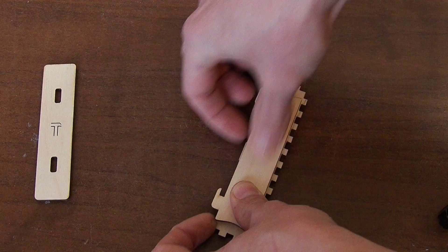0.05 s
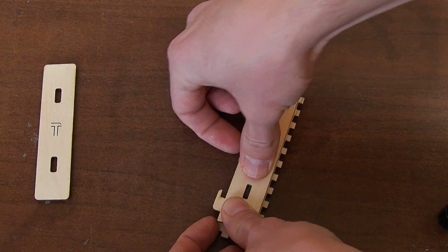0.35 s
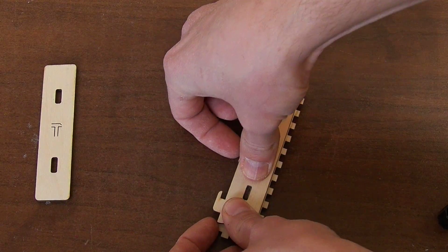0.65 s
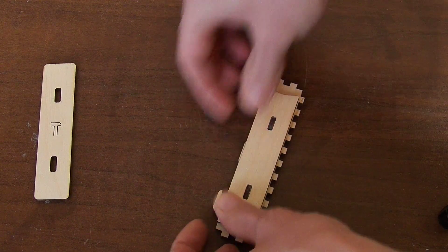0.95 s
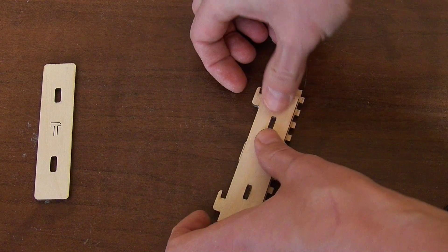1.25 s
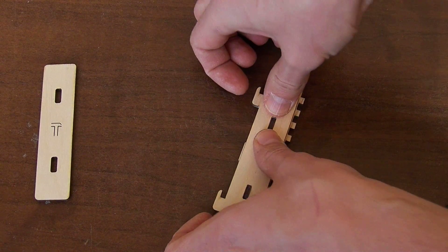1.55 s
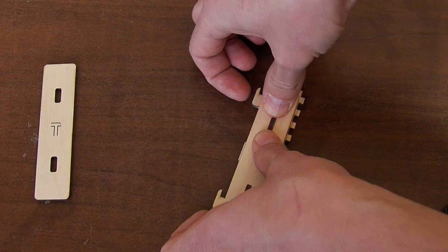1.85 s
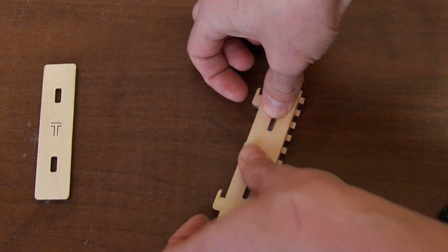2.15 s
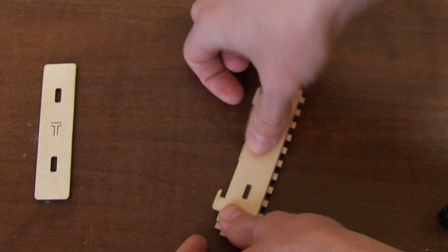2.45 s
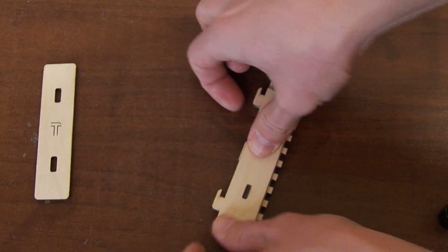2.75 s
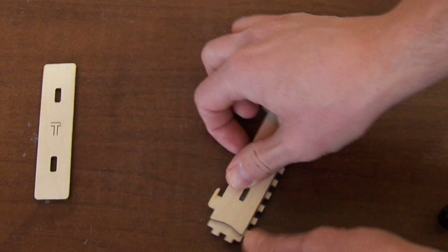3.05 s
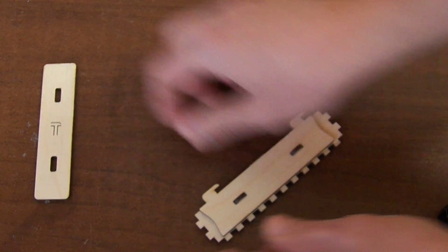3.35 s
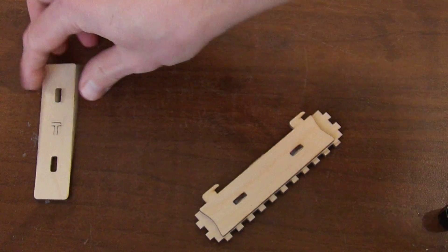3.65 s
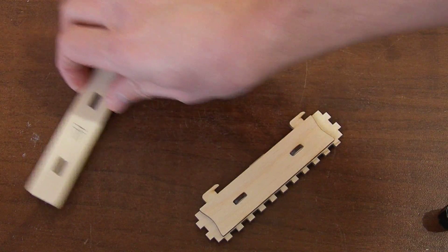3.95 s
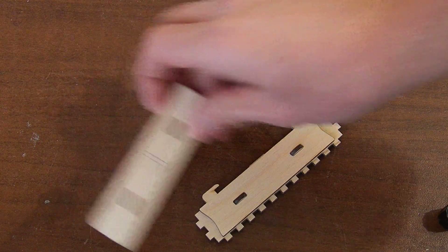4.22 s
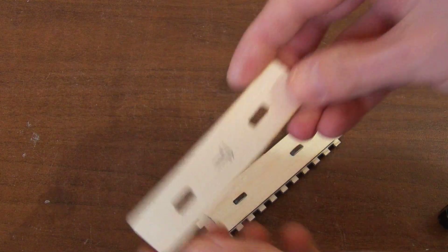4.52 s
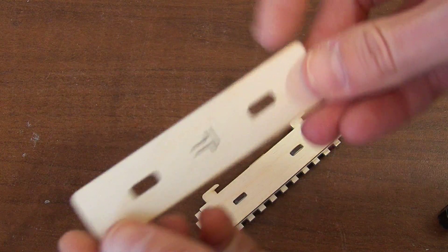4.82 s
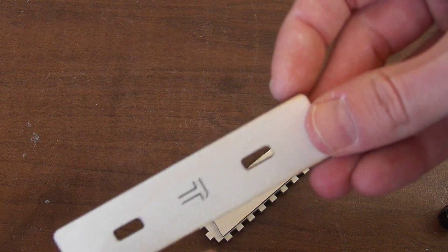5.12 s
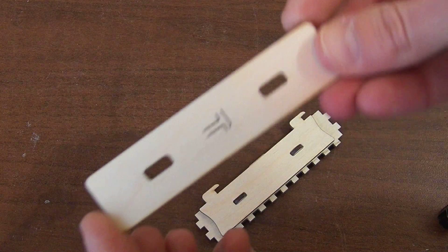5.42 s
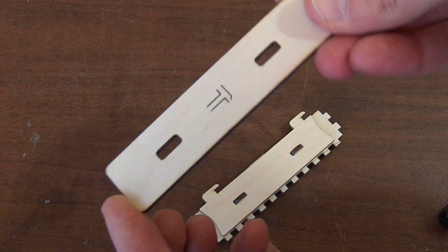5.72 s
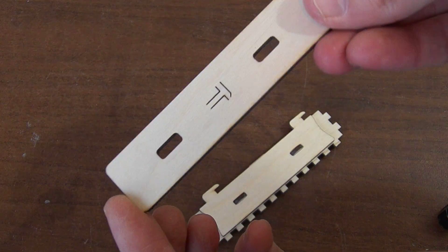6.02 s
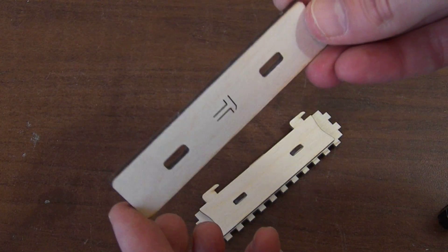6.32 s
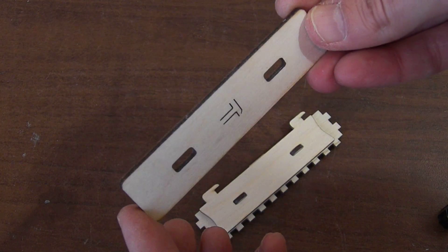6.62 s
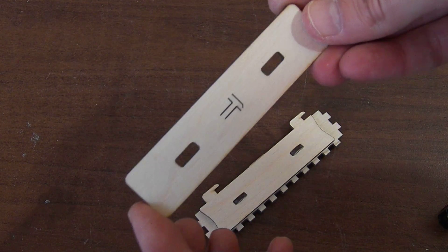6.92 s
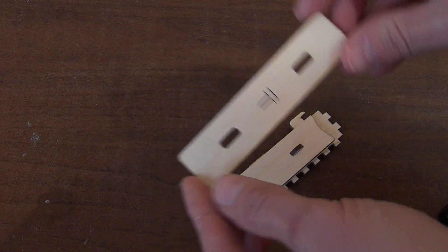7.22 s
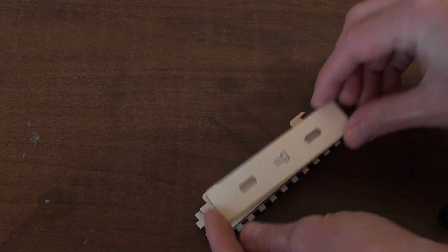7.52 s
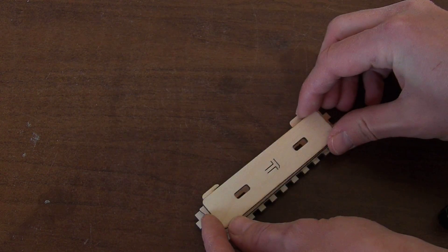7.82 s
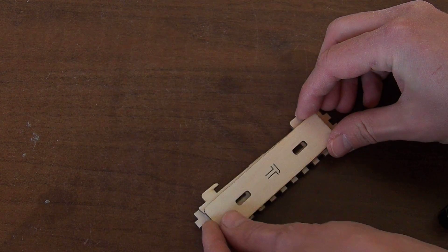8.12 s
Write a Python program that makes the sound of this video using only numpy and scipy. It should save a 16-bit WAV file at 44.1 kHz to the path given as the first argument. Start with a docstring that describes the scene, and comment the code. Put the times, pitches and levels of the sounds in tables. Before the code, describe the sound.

Small wooden parts rub and click into place with two sharp, splintery snaps, heard close up with a short room ring. After that everything is much quieter: hands rustle, wood scrapes briefly over a table, and a few light taps come as a thin strip is picked up and set down. Faint purring steps of a camera's focus motor and a low hiss run underneath.

```python
"""In a small room, over the hiss of a camera close by, thumbs press a thin plywood strip onto two tabs.
Each snaps home in turn, an impulse that excites the modes of strip, tab and wooden table; the camera's
gain control ducks after each snap and creeps back. From the first second on, its lens motor steps softly.
The piece is slid aside with a grind of friction. A second strip is picked up, turned in the fingers
and at last laid on top with a light tap."""
import sys
import numpy as np
from scipy import signal
from scipy.fft import rfft, irfft
from scipy.io import wavfile
from scipy.ndimage import uniform_filter1d, minimum_filter1d

SR = 44100
rng = np.random.default_rng(int(sys.argv[2]) if len(sys.argv) > 2 else 0)


def transcribe(signal):
    """Save signal, clipped to [-1, 1], as a 16-bit WAV file at the path in sys.argv[1]."""
    frames = np.atleast_2d(signal).T
    limited = np.clip(frames, -1, 1)
    pcm = np.round(limited * 32767).astype(np.int16)
    wavfile.write(sys.argv[1], SR, pcm)


N = 360297
TIME = np.arange(N) / SR

# modes of the plywood strip: pitch_hz, level_db, t60_s
STRIP_MODES = [(1180, -23, .015), (1814, -38, .025), (1970, -23, 0.035), (2780, -33, .025),
               (3573, -26, .03), (3840, -18.5, .02), (4100, -26, 0.022), (5170, -19, .025),
               (5800, -22.5, .015), (6700, -21, .02), (7145, -30, .02), (7220, -28.5, .02),
               (7660, -24, .02), (10130, -21, .012), (10800, -12, .015), (13300, -11.5, 0.0067)]
# modes of the table top: pitch_hz, level_db, t60_s
TABLE_MODES = [(88, -29, 0.33), (122, -15, 0.06), (183, -19.5, 0.039), (260, 1, 0.011), (360, -8.5, 0.024),
               (438.3, -3, 0.026), (550, -21.5, 0.087), (806, -16.5, .04)]


def undb(db):
    """Decibels as an amplitude ratio."""
    return 10 ** (np.asarray(db) / 20)


def unit(x):
    """Normalisation to an rms of 1."""
    return x / np.sqrt(np.mean(x ** 2))


def add(track, start_s, sound):
    """Superposition: a sound adds to the track from start_s on."""
    start = max(int(start_s * SR), 0)
    part = sound[..., :N - start]
    track[..., start:start + part.shape[-1]] += part


def colour(x, spectrum):
    """Spectral shaping by (frequency_hz, level_db) points, to an rms of 1."""
    hz, db = np.transpose(spectrum)
    bins = np.maximum(np.fft.rfftfreq(x.shape[-1], 1 / SR), 1)
    gain = undb(np.interp(np.log(bins), np.log(hz), db))
    return unit(irfft(rfft(x) * gain, x.shape[-1]))


def lowpass(x, hz, order=2):
    """Attenuation above a cut-off."""
    return signal.sosfilt(signal.butter(order, min(hz, .45 * SR), fs=SR, output="sos"), x)


def highpass(x, hz, order=2):
    """Attenuation below a cut-off."""
    return signal.sosfilt(signal.butter(order, hz, "high", fs=SR, output="sos"), x)


def pair(size, coherence):
    """Partial coherence: left and right noise share a fraction of their power."""
    noise = rng.standard_normal((3, size))
    return np.sqrt(coherence) * noise[2] + np.sqrt(1 - coherence) * noise[:2]


def held(size, samples):
    """Sample and hold: random values, each kept for so many samples."""
    return np.repeat(rng.standard_normal(size // samples + 1), samples)[:size]


def fade(t, t60):
    """Exponential decay, 60 dB in t60 seconds."""
    return np.exp(-np.log(1000) * t / t60)


def swell(start_s, length_s, edge_s):
    """Trapezoidal envelope, half way up at the start and at the end of its length."""
    return np.clip(.5 + np.minimum(TIME - start_s, start_s + length_s - TIME) / edge_s, 0, 1)


def ring(t, modes, detune, scatter_db):
    """Damped modes: each blow meets them in another place, and each radiates its own share to each side."""
    hz, db, t60 = np.transpose(modes)
    hz = hz * (1 + detune * rng.standard_normal(len(hz)))
    shares = undb(db + scatter_db * rng.standard_normal((2, len(hz))))
    return shares @ (np.sin(2 * np.pi * hz[:, None] * t) * fade(t, t60[:, None]))


def background(air_db=-58.5, hiss_db=-57, whine_hz=678, whine_db=-74, drone_hz=160, drone_db=-64):
    """Noise floor: low room noise, a thin whine and a passing drone under the microphone's self-noise."""
    # spectrum of the room's air: frequency_hz, density_db
    air_spectrum = [(20, -8.5), (35, 6.5), (48, 9), (60, -2.5), (90, 2), (170, -0.5), (240, -9.5),
                    (310, -6.5), (390, 5), (480, -2), (800, -5), (1400, -14.5), (2600, -36), (5000, -40)]
    # spectrum of the microphone's hiss: frequency_hz, density_db
    hiss_spectrum = [(300, 5), (1500, 0.5), (3000, -8.5), (4300, -35.5), (6000, -4.5), (8000, 0.5),
                     (11000, 2.5), (15500, 2)]
    air = undb(air_db) * colour(pair(N, coherence=.65), air_spectrum)
    hiss = undb(hiss_db) * colour(pair(N, coherence=0), hiss_spectrum)
    whine = undb(whine_db) * np.sin(2 * np.pi * whine_hz * TIME)
    passing = swell(start_s=6.24, length_s=.3, edge_s=.065)
    drone = undb(drone_db) * passing * np.sin(2 * np.pi * drone_hz * TIME)
    return air + hiss + np.sqrt(2) * (whine + drone)


def fingers(hold_db=-73, edge_s=.1):
    """Friction noise: dry skin whispers on sanded wood and hands rustle; incoherent parts add in power."""
    # changes of grip: start_s, length_s, whisper_db, rustle_db
    grips = [(0, 0.36, -65.5, -60.5), (1.15, 0.49, -98, -52), (2.0, 0.56, -75.5, -51),
             (2.335, 0.39, -59, -52), (2.808, 0.72, -65.5, -72), (3.62, 0.47, -64.5, -57),
             (4.21, 0.71, -67, -78), (5.08, 0.59, -69.5, -65.5), (7.078, 0.48, -69, -75),
             (7.45, 0.77, -69.5, -80)]
    # spectrum of skin on wood: frequency_hz, density_db
    skin_spectrum = [(1000, -10.5), (1900, -2.5), (3000, -3), (4500, -1), (5600, -1), (8000, -5),
                     (15000, -17.5)]
    # spectrum of a moving hand: frequency_hz, density_db
    rustle_spectrum = [(60, 2.5), (110, 3), (240, -3.5), (420, 4), (800, -5.5), (1400, -13), (2600, -34.5),
                       (6000, -48.5)]
    whisper_power, rustle_power = undb(hold_db) ** 2, 0  # fingers that only hold still whisper
    for start_s, length_s, whisper_db, rustle_db in grips:
        motion = swell(start_s, length_s, edge_s)
        whisper_power += motion * undb(whisper_db) ** 2
        rustle_power += motion * undb(rustle_db) ** 2
    whisper = np.sqrt(whisper_power) * colour(pair(N, coherence=.13), skin_spectrum)
    rustle = np.sqrt(rustle_power) * colour(pair(N, coherence=.83), rustle_spectrum)
    return whisper + rustle


def slides(grain_db=2, lurch_db=3, edge_s=.007, catch_per_s=300, catch_db=-9, catch_spread_db=5):
    """Sliding friction: fibres grind in dense grains, single catches ring the strip, sharp edges squeak."""
    # wood sliding on wood or on the table: start_s, length_s, grind_db, squeak_db
    strokes = [(0.021, .03, -60, -44.5), (.21, .015, -54, -57.5), (0.336, .03, -63.5, -69),
               (0.851, 0.067, -39.5, -55), (1.543, 0.11, -61, -92), (2.213, 0.028, -49, -54),
               (2.778, 0.013, -54.5, -56), (2.846, .245, -55, -64), (3.205, 0.1, -59, -69),
               (3.28, 0.032, -54, -71), (3.715, 0.035, -58, -52), (3.732, .018, -43, -58),
               (3.748, 0.23, -60, -70), (3.844, 0.076, -61, -61), (4.823, 0.022, -68, -62)]
    # spectrum of grinding fibres: frequency_hz, density_db
    grind_spectrum = [(60, -14), (250, -3.5), (450, 6.5), (800, -1), (1250, -6), (1800, -5.5),
                      (2400, -12.5), (3000, -7.5), (4000, -11.5), (4900, -20.5), (8000, -28),
                      (15000, -34.5)]
    # spectrum of a squeaking edge: frequency_hz, density_db
    squeak_spectrum = [(2000, -20.5), (3600, -14.5), (4800, -12), (5700, -8), (6500, -7), (7600, -4),
                       (9000, -11), (11000, -22), (15000, -25.5)]
    out, t = np.zeros((2, N)), TIME[:SR // 3]
    for start_s, length_s, grind_db, squeak_db in strokes:
        # the piece moves in small lurches, with a new grip about every millisecond
        lurch = uniform_filter1d(held(len(t), samples=441), size=220)
        grip = undb(grain_db * held(len(t), samples=49))
        stroke = np.clip(np.minimum(t, length_s + edge_s - t) / edge_s, 0, 1) * undb(lurch_db * lurch)
        caught = rng.random(len(t)) < catch_per_s / SR
        catches = caught * undb(catch_spread_db * rng.standard_normal(len(t)))
        # the fingers clamp the strip differently in every stroke, which shifts its modes
        strip = ring(t, STRIP_MODES, detune=.035, scatter_db=3)
        strip = highpass(lowpass(strip, hz=6000), hz=670)
        rasp = unit(signal.fftconvolve(catches[None], strip, axes=1)[:, :len(t)])
        grind = colour(grip * pair(len(t), coherence=.65), grind_spectrum) + undb(catch_db) * rasp
        squeak = colour(grip * pair(len(t), coherence=.12), squeak_spectrum)
        add(out, start_s - edge_s / 2, stroke * (undb(grind_db) * grind + undb(squeak_db) * squeak))
    return out


def reflection(x, lag_s=.0028, level_db=-11):
    """Early reflection: a near surface returns one delayed, weaker copy."""
    out = np.zeros_like(x)
    add(out, lag_s, undb(level_db) * x)
    return out


def room(x, wet_db=-3, build_s=.003):
    """Reverberation: a diffuse field builds up and decays, the treble first."""
    # the room's response to the wood: frequency_hz, level_db, t60_s
    response = [(70, -7, 0.55), (125, -3, 0.74), (220, -5, 0.46), (440, 0.5, 0.5), (900, 5.5, .48),
                (1700, 8, .46), (2583, 3.5, 0.31), (3750, 9.5, .35), (5000, 5, 0.3), (6800, 4.5, 0.27),
                (9900, 7.5, 0.17), (14800, -13, 0.28)]
    hz, db, t60 = np.transpose(response)
    t, log_bins = TIME[:SR], np.log(np.arange(SR // 2 + 1) + 1)
    bands = np.array([np.interp(log_bins, np.log(hz), row) for row in np.eye(len(hz))])
    noise = irfft(rfft(pair(SR, coherence=.34))[:, None] * bands, SR)
    tail = (noise * undb(db)[:, None] * fade(t, t60[:, None])).sum(axis=1)
    tail *= 1 - np.exp(-t / build_s)
    return signal.fftconvolve(x, undb(wet_db) * unit(tail) / np.sqrt(SR), axes=1)[:, :N]


def contact(cutoff_hz, tab_hz, tab_db, tick_db=2, crack_db=-4, splinter_db=-24, tab_rise_s=.0002):
    """Impulse excitation: wood meets wood with a crack, and the strip and the short tab ring freely."""
    t = TIME[:SR // 3]
    envelope = undb(crack_db) * fade(t, t60=.0028) + undb(splinter_db) * fade(t, t60=.045)
    crack = pair(len(t), coherence=.6) * envelope
    crack[:, 0] += undb(tick_db)
    # so small a piece radiates little bass; a softer contact also leaves out the treble
    crack = lowpass(highpass(crack, hz=2400, order=1), cutoff_hz)
    strip = lowpass(ring(t, STRIP_MODES, detune=.008, scatter_db=1.2), cutoff_hz)
    at_ports = t - np.array([[0], [12e-6]])  # the tone reaches the right microphone port later
    tab_envelope = fade(t, t60=.0049) * (1 - np.exp(-t / tab_rise_s))
    tab = undb(tab_db) * np.sin(2 * np.pi * tab_hz * at_ports) * tab_envelope
    return crack, strip, tab


def table_thump(yield_s=.0014):
    """Inertia: the heavy table takes a moment to give way, then rings."""
    t = TIME[:SR // 3]
    ringing = ring(t, TABLE_MODES, detune=.013, scatter_db=1.5)
    return highpass(ringing * (1 - np.exp(-t / yield_s)), hz=80)


def impacts(tap_tab_hz=4170, tap_low_hz=299.6, strip_send_db=-18):
    """Impact radiation: taps and snaps give a direct sound and a share sent into the room."""
    # Tab and thump are relative to the blow's level; pan is left minus right.
    # loose pieces touch each other or the table: start_s, level_db, cutoff_hz, tab_db, thump_db, pan_db
    taps = [(.053, -24.5, 2900, -11, 0, 0), (.222, -40.5, 900, -25, 11, -0.5),
            (1.546, -35.5, 2990, -20, 13.5, 2), (2.5479, -19, 10400, -4, -12.5, -2.5),
            (2.85, -33, 6000, -18, -1, 0), (2.894, -47, 4000, -7, -8, -4),
            (3.739, -23.5, 3600, -11, -21, 6), (3.745, -26, 3400, -24, -3, 3),
            (4.596, -33.5, 8000, 0.5, -17, -9), (7.157, -43.5, 4860, 0.5, -27, -6),
            (7.3919, -24, 5700, -10, -27, -3.5)]
    # a joint gives way and slams home: start_s, level_db, cutoff_hz, tab_hz, tab_db, thump_db, pan_db
    snaps = [(0.5692, 31, 16400, 7010, 10.5, -12, 0.5), (0.5751, 28.5, 18230, 3860, -14.5, -23.5, -1.5),
             (0.6059, 25, 10700, 5540, -3.5, -30, 2.5), (1.634, -18.5, 15140, 4600, -3, -16, 2),
             (1.643, 19.5, 2980, 3600, 0, 1, 1), (1.6496, 22, 18350, 11900, 4, -18, -0.5),
             (1.6521, 15.5, 2970, 4380, 6, -12, -1)]
    direct, sent = np.zeros((2, N)), np.zeros((2, N))

    def strike(start_s, level_db, pan_db, crack, strip, tab, thump):
        gain = undb(level_db + np.array([[pan_db], [-pan_db]]) / 2)
        add(direct, start_s, gain * (crack + strip + tab + thump))
        # the flat faces beam their tones upward, while the crack spreads everywhere
        add(sent, start_s, gain * (crack + thump + undb(strip_send_db) * strip))

    for start_s, level_db, cutoff_hz, tab_hz, tab_db, thump_db, pan_db in snaps:
        wood = contact(cutoff_hz, tab_hz, tab_db)
        strike(start_s, level_db, pan_db, *wood, undb(thump_db) * table_thump())
    for start_s, level_db, cutoff_hz, tab_db, thump_db, pan_db in taps:
        wood = contact(cutoff_hz, tap_tab_hz, tab_db)
        thump = highpass(table_thump(), tap_low_hz)  # a light tap hardly moves the deep modes
        strike(start_s, level_db, pan_db, *wood, undb(thump_db) * thump)
    return direct, sent


def afterrings():
    """Beating: many close modes interfere and die away together."""
    # a high wooden ring that lingers after some blows: start_s, centre_hz, width_hz, level_db, t60_s
    clusters = [(.575, 3800, 480, -3, .44), (1.65, 3950, 1000, -15, .47), (4.597, 4200, 1100, -61, .25),
                (7.392, 4400, 1800, -59, .25)]
    out, t = np.zeros((2, N)), TIME[:SR]
    bins = np.fft.rfftfreq(SR, 1 / SR)
    for start_s, centre_hz, width_hz, level_db, t60_s in clusters:
        band = 1 / (1 + (2 * (bins - centre_hz) / width_hz) ** 4)
        cluster = irfft(rfft(pair(SR, coherence=.3)) * band, SR)
        add(out, start_s, undb(level_db) * unit(cluster) * fade(t, t60_s))
    return out


def lens_steps(tick_s=.06673, first_push_db=.5, check_db=-47):
    """Clocked pulse train of (time_s, level_db): every tick in a hunt, every second tick between hunts."""
    # the lens motor hunts for focus: first_step_s, last_step_s, level_db
    hunts = [(1.029, 1.095, -36), (1.23, 1.496, -40), (1.967, 2.494, -39.5), (2.766, 2.963, -46.5),
             (3.165, 3.364, -45.5), (3.5, 3.699, -46.5), (3.898, 4.03, -44.5), (4.368, 4.632, -48),
             (4.898, 4.965, -46.5), (5.502, 5.634, -45.5), (5.901, 6.099, -48), (6.433, 6.502, -49.5),
             (6.768, 6.901, -46.5)]
    steps = []
    for (first_s, last_s, level_db), following in zip(hunts, hunts[1:] + hunts[-1:]):
        end = round((last_s - first_s) / tick_s)
        resume = round((following[0] - first_s) / tick_s)
        steps += [(first_s + k * tick_s, level_db + first_push_db * (k == 0)) for k in range(end + 1)]
        steps += [(first_s + k * tick_s, check_db) for k in range(end + 2, resume - 1, 2)]
    return steps


def lens_motor(step_hz=382, step_s=.02737, glide=.21, body_hz=398, body_db=-15, pan_db=8):
    """Resonance: each motor step is a short rising purr that leaves the camera body ringing faintly."""
    out, t = np.zeros(N), TIME[:SR // 2]
    progress = np.minimum(t / step_s, 1)
    for time_s, level_db in lens_steps():
        detune, purr_phase, body_phase, uneven_db = rng.standard_normal(4)
        hz = step_hz * (1 + .027 * detune + glide * (progress - .5))
        purr = np.sin(np.pi * progress) ** 2 * np.sin(2 * np.pi * np.cumsum(hz) / SR + np.pi * purr_phase)
        body = progress * fade(t, t60=.74) * np.sin(2 * np.pi * body_hz * t + np.pi * body_phase)
        add(out, time_s - step_s / 2, undb(level_db + uneven_db) * (purr + undb(body_db) * body))
    return out * undb(np.array([[pan_db], [-pan_db]]) / 2)


def hand_bumps(cutoff_hz=110):
    """Compliant contact: flesh pushes slowly, so only the deepest modes of the table answer."""
    # the heel of a hand meets the table: start_s, level_db
    bumps = [(2.509, -38), (2.818, -43), (3.668, -35), (4.541, -50), (7.66, -42), (7.749, -40)]
    out, t = np.zeros((2, N)), TIME[:SR // 3]
    for start_s, level_db in bumps:
        ringing = ring(t, TABLE_MODES, detune=.04, scatter_db=1)
        add(out, start_s, undb(level_db) * lowpass(ringing, cutoff_hz, order=4))
    return out


def scene():
    """Superposition of the wood, its reflection and reverberation, the lens motor and the noise floor."""
    blows, sent = impacts()
    rubbing = slides() + fingers()
    wood = blows + rubbing + hand_bumps()
    into_room = sent + undb(-3) * rubbing
    return wood + reflection(wood) + afterrings() + room(into_room) + lens_motor() + background()


def gain_control(x, ceiling_db=-27, sense_hz=1200, release_db_per_s=31):
    """Limiting: the gain drops at once when lows and mids get too loud, then climbs at a steady rate."""
    sensed = lowpass(x, sense_hz, order=1)
    power = uniform_filter1d(np.mean(sensed ** 2, axis=0), size=132)
    excess_db = np.maximum(10 * np.log10(np.maximum(power, 1e-12)) - ceiling_db, 0)
    climb_db = release_db_per_s * TIME
    cut_db = np.maximum.accumulate(excess_db + climb_db) - climb_db
    # it looks a moment ahead, so the attack passes unbent
    return x * undb(uniform_filter1d(minimum_filter1d(-cut_db, size=33), size=33))


def record(dry, top_hz=15850):
    """Band limiting: the camera's microphone drops the deep bass, rides its gain and cuts the top."""
    ridden = gain_control(highpass(dry, hz=64, order=4))
    return signal.sosfilt(signal.ellip(10, .2, 80, top_hz, fs=SR, output="sos"), ridden)


dry = scene()
out = record(dry)
transcribe(out)
```